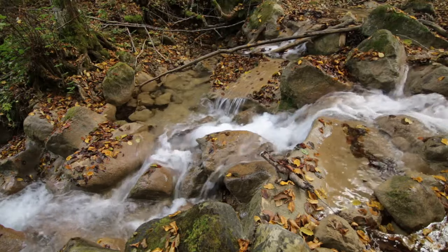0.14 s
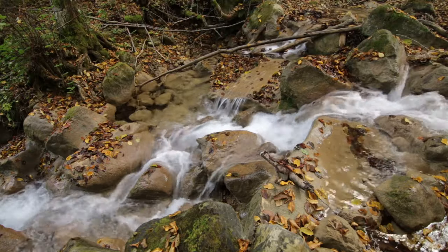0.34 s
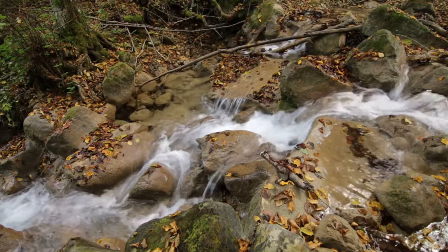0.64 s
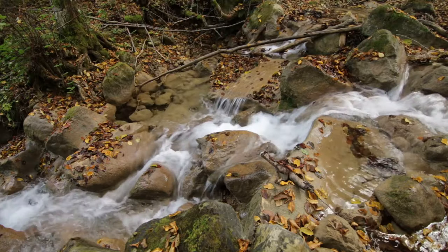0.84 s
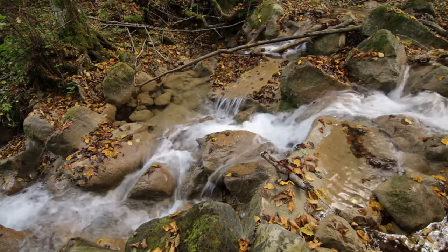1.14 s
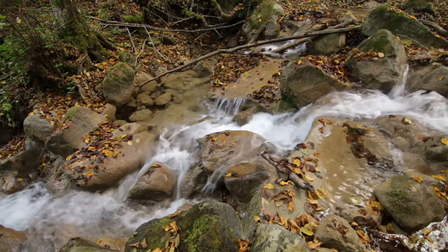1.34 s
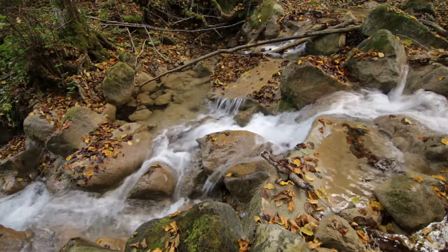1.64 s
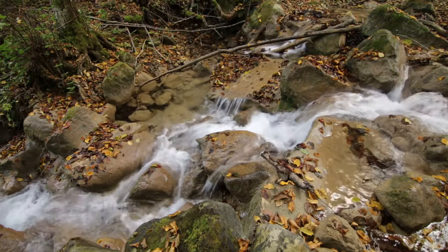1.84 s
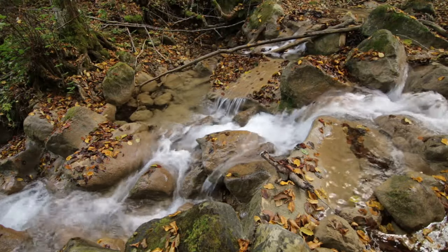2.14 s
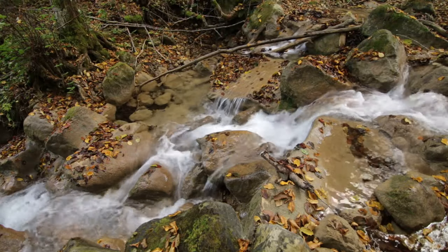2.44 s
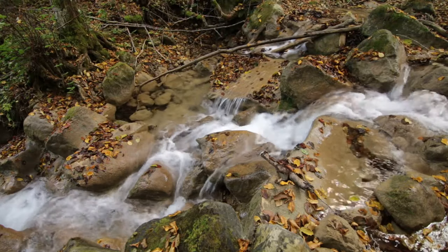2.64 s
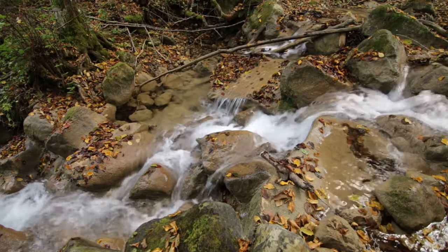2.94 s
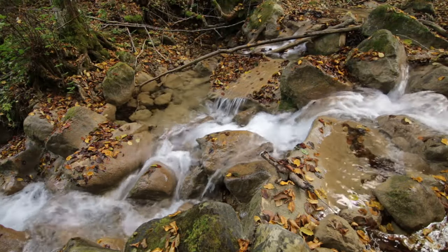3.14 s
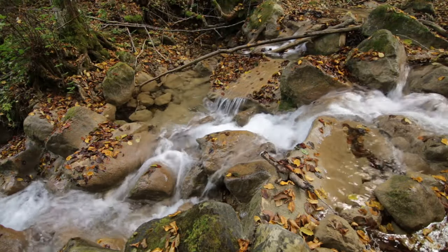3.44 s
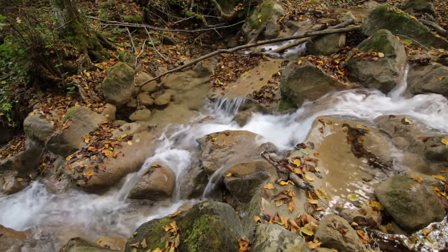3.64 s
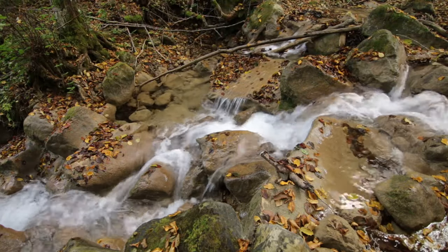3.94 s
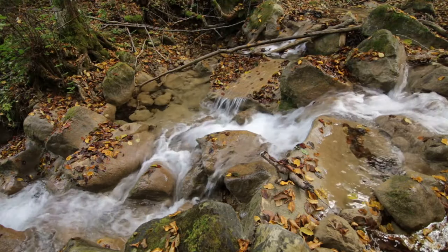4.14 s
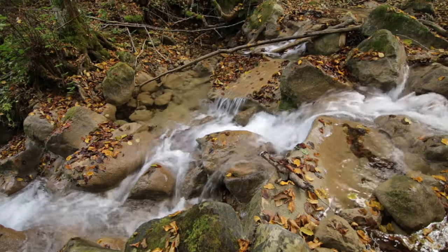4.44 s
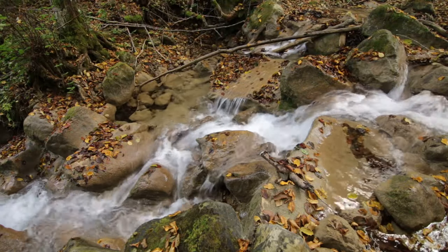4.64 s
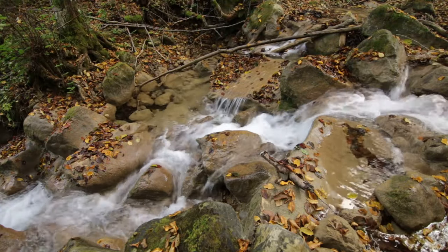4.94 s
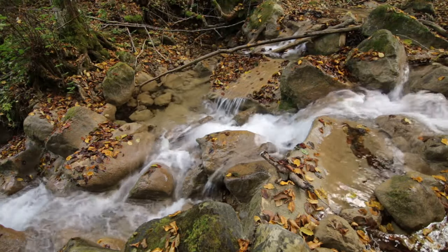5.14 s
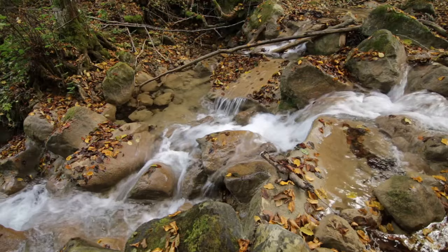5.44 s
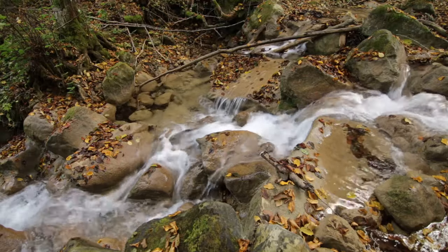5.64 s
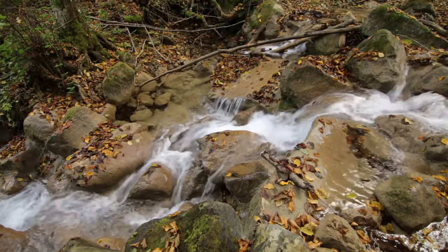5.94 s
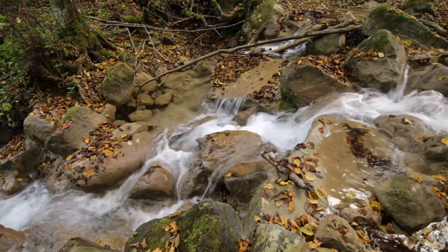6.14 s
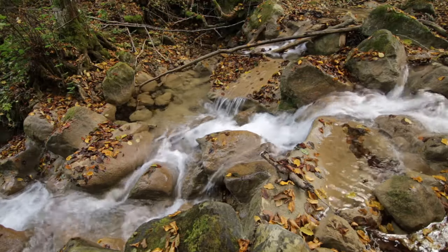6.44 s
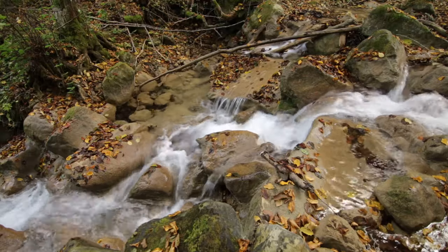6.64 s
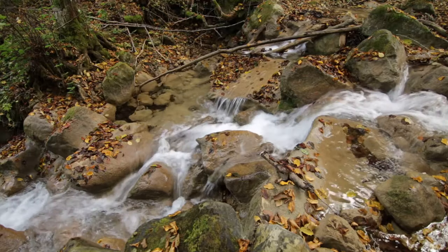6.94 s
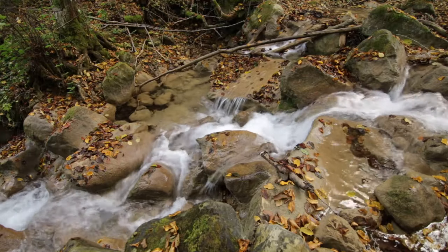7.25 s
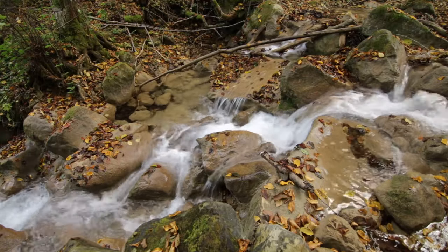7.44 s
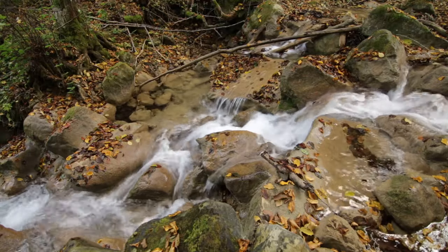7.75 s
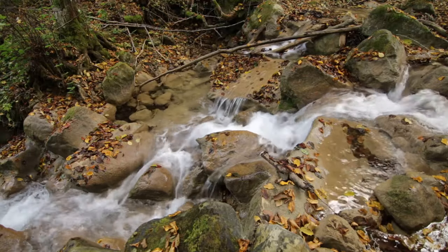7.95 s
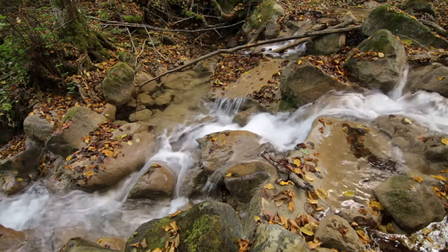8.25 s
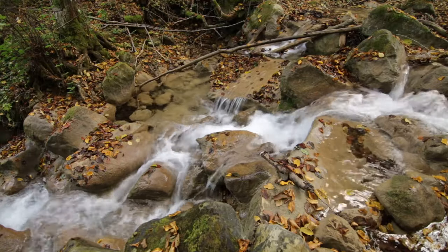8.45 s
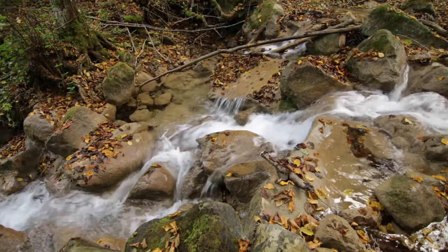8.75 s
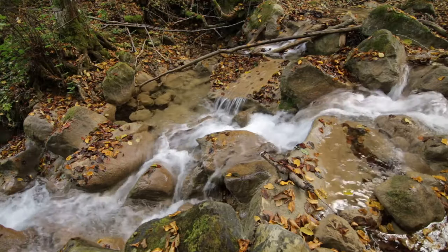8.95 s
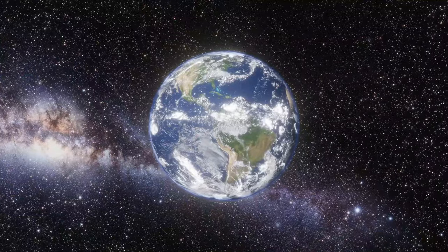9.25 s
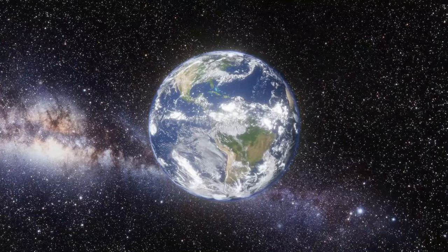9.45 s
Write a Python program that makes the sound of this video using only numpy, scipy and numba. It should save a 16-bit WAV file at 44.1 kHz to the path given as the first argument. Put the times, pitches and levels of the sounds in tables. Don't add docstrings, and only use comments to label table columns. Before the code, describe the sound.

Close, continuous gurgling of shallow water tumbling across rocks, bright with fine splashes and little bubble plops, cutting to silence near the end.

```python
import sys
import numpy as np
from scipy import signal
from scipy.fft import rfft, irfft
from scipy.io import wavfile
from scipy.ndimage import uniform_filter1d
from numba import njit

SR = 44100
rng = np.random.default_rng(int(sys.argv[2]) if len(sys.argv) > 2 else 0)


def field_ratio(decibels):
    return 10 ** (np.asarray(decibels, dtype=float) / 20)


def unload_audio(sound):
    columns = np.transpose(np.atleast_2d(sound))
    steps = np.round(np.clip(columns, -1, 1) * 32767)
    wavfile.write(sys.argv[1], SR, steps.astype(np.int16))


N = 423801

CROSSOVERS_HZ = (330, 780, 1800)
# frequency in Hz, level in dB per Hz.
WATER_COLOUR = [(15, -66.5), (25, -37), (80, -23), (129, -7), (261, -6), (617, -1.5), (830, -5), (1000, -4),
                (1770, -9.5), (2570, -9), (3030, -11.5), (3560, -13), (9900, -18), (13700, -22),
                (15700, -30.5)]
# frequency in Hz, left minus right in dB.
STEREO_LEAN = [(60, -6), (110, -1.5), (200, -1.0), (380, -1.5), (700, -1.0), (1290, -2.0), (2380, -2.0),
               (4400, -2.5), (8120, -3.5), (15000, -5.5)]
# frequency in Hz, likeness of left and right 0-1.
FAR_LIKENESS = [(60, 0.8), (130, 0.94), (290, 0.93), (640, 1), (1410, 0.5), (3100, 0.6), (6820, 0.03),
                (15000, 0.2)]
# level in dB, left lag in samples, spread of lag over the bed
# in samples, ring length in cycles, size scatter in dB, pitch rise as a fraction.
NEAR_CLOUD = (0.1, 2.21, 1.34, 8.55, 2.65, .25)
SIDE_CLOUD = (-2.5, -0.5, 4.5, 6.5, 2, 0.32)
# delay in ms, level in dB, phase turned by the wet surface in cycles.
ROCK_ECHOES = [(.95, -16, -0.35), (1.9, -21, 0.046)]
# pitch in Hz, width in Hz, lift in dB.
ROCK_HOLLOWS = [(72, 22, 5), (128.6, 20, 5.5), (663, 92, 1.5), (1000.4, 38, 5.5), (1130, 120, 3.5),
                (2095, 310, 2), (2666, 380, 0.34), (3540, 600, 2), (4520, 260, 2.2), (5500, 440, 1),
                (6630, 380, 1), (9750, 700, 1.2)]
# time in seconds, level in dB.
FLOW_LEVELS = [(0.0, -24), (0.2, -25.5), (1.22, -25), (1.32, -23.5), (1.64, -25), (4.71, -26),
               (5.13, -24.5), (5.78, -25.5), (6.1, -25), (7.72, -25.5), (8.89, -25.5), (8.94, -25)]
# depth in dB, changes per second.
SIZE_WAVER = [
    (1.3, 6),
    (0.6, 15),
    (0.63, 12),
    (0.33, 8),
]
# time in seconds, lift in dB.
WATER_SLUGS = [(0.11, 0.5), (0.57, 2), (0.92, -1), (1.09, 2), (2.24, 0.5), (2.31, 1), (3.19, 1),
               (3.53, 1.5), (3.63, -0.5), (3.81, 1), (4.63, -1), (4.9, 1.5), (6.08, 2.5), (6.5, 0.5),
               (6.6, 3), (8.04, 4.5), (8.71, 3), (8.79, 1)]
# time in seconds, change in dB.
CHURN_LULLS = [(0.52, -1), (0.82, -2), (0.97, -1), (1.79, -1.5), (2.16, -1), (2.74, -2.5), (3.46, -2.5),
               (3.58, -1.5), (4.56, -0.5), (4.68, 0), (5.95, -3.5), (6.57, -3), (8.02, -2)]
SLUG_SHARES = (0.093, 1.35, .2, 0.18)
# start in seconds, peak in dB, pitch in Hz.
BIG_BUBBLES = [(0.12, -6, 557), (0.261, -5.5, 571), (1.033, -10.5, 724), (1.284, -11, 697),
               (1.648, -6.5, 686), (1.965, -8, 608), (2.025, -4, 511), (2.125, -6, 455), (2.514, -6.5, 593),
               (2.589, -9.5, 711), (2.844, -10, 635), (3.056, -7, 713), (3.178, -6.5, 436),
               (3.62, -5.5, 452), (3.799, -3.5, 568), (4.189, -7, 581), (4.612, -7.5, 458),
               (4.643, -5, 301), (4.979, -8, 390), (5.016, -8.5, 418), (5.246, -7.5, 474), (5.96, -7, 476),
               (6.479, -11.5, 643), (8.033, -11.5, 434), (8.282, -10.5, 621), (8.475, -7.5, 372),
               (8.682, -7, 646), (8.784, -3.5, 635)]
# start in seconds, peak in dB, pitch in Hz.
HOLLOW_PLOPS = [(0.308, -9, 1104), (1.59, -5.5, 936), (3.571, -6, 1102), (3.74, -10.5, 1010),
                (4.244, -4, 1003), (5.202, -9, 972), (5.521, -9, 1000), (6.852, -10.5, 1004),
                (7.07, -5, 1050), (7.12, -6.5, 1100), (7.19, -6, 1000), (7.799, -1, 999), (8.349, -9, 1195),
                (8.384, -7, 998)]
# start in seconds, peak in dB, pitch in Hz.
ROCK_DROPS = [(0.127, -12, 2550), (0.204, -12, 2390), (0.504, -6.5, 2110), (0.955, -13, 2170),
              (1.847, -14, 2020), (2.0, -13.5, 2780), (2.127, -12, 2540), (2.493, -9, 2580),
              (2.8325, -14, 1930), (2.959, -11.5, 2300), (3.013, -6.5, 2250), (5.529, -7.5, 2640),
              (6.011, -14.5, 2045), (6.197, -10.5, 2470), (6.357, -15, 2060), (6.456, -12.5, 2025),
              (7.998, -16, 2040), (8.626, -13, 2130), (8.765, -10.5, 2210), (8.892, -12.5, 2065)]

WATER_DB, FAR_DB, FAR_ECHO_DB = -19, 0.5, -11.5
SPLASH_S, SPLASH_SIZE_SPREAD = 0.012, 0.0406
SLUG_S, LULL_S = 0.022, 0.034
GULP_CYCLES, PLOP_CYCLES, DROP_CYCLES = 10.5, 9, 5
START_DELAY_S = 0.0015
MIC_TOP_HZ = 15650
RUMBLE_DB, RUMBLE_TOP_HZ = -68.5, 55
CUT_S, FADE_S = 8.953, 0.002


def curve(points, hz):
    f, v = np.transpose(points)
    return np.interp(np.log(hz + 1), np.log(f + 1), v)


def level(x, db):
    return x * field_ratio(db) / np.sqrt(np.mean(x ** 2))


@njit
def ring(start, turn, cycles, size, rise, n):
    out = np.zeros(n)
    for k in range(len(start)):
        length = int(cycles[k] / turn[k]) + 1
        first = int(np.ceil(start[k]))
        pole = 2j * np.pi * turn[k] - np.log(100.) / length
        z = size[k] * np.exp(pole * (first - start[k]))
        p = np.exp(pole)
        climb = np.exp(2j * np.pi * turn[k] * rise / length)
        for i in range(max(first, 0), min(first + length, n)):
            out[i] += z.imag
            z *= p
            p *= climb
    return out


def bubble_cloud(db, lag, spread, cycles, scatter_db, rise, splashes, bubbles_each):
    count = splashes * bubbles_each
    when, small = np.repeat(rng.random((splashes, 2)), bubbles_each, axis=0).T
    place = np.repeat(rng.standard_normal(splashes), bubbles_each)
    after, unlike, long = rng.random((count, 3)).T
    small = np.clip(small + SPLASH_SIZE_SPREAD * (2 * unlike - 1), 0, 1)
    low, high = np.sqrt(90), np.sqrt(16000)
    hz = (low + small * (high - low)) ** 2
    rare = np.minimum(rng.exponential(size=count), 4)
    strength = hz ** 0.75 * field_ratio(scatter_db * rare / (1 + hz / 5000))
    start = when * N + after * SPLASH_S * SR
    half_lag = (lag + spread * place) / 2
    rings = cycles * (0.5 + long)
    ears = [ring(start + side * half_lag, hz / SR, rings, strength, rise, N) for side in (1, -1)]
    return level(np.array(ears), db)


def far_water(hz):
    mid, side = rfft(rng.standard_normal((2, N)))
    alike = np.clip(curve(FAR_LIKENESS, hz), 0, 1)
    mid = mid * np.sqrt(1 + alike)
    side = side * np.sqrt(1 - alike)
    return np.array([mid + side, mid - side]) / np.sqrt(2) * field_ratio(FAR_DB)


def rock_echoes(hz, offset_db):
    response = 1
    for ms, db, turn in ROCK_ECHOES:
        response = response + field_ratio(db + offset_db) * np.exp(-2j * np.pi * (hz * ms / 1000 + turn))
    return response


def rock_hollows(hz):
    return field_ratio(sum(db / (1 + ((hz - f) / width * 2) ** 2) for f, width, db in ROCK_HOLLOWS))


def waver(rate_hz):
    steps = rng.standard_normal(400)[(np.arange(N) * rate_hz / SR).astype(int)]
    hold = int(SR / rate_hz)
    smooth = uniform_filter1d(uniform_filter1d(steps, hold), hold)
    return smooth / np.std(smooth)


def bumps(table, width_s):
    t = np.arange(N) / SR
    return sum(db * np.exp(-((t - s) / width_s) ** 2) for s, db in table)


def surges(water, hz):
    s, flow_db = np.transpose(FLOW_LEVELS)
    flow_db = np.interp(np.arange(N) / SR, s, flow_db - np.mean(flow_db))
    slug_db = bumps(WATER_SLUGS, SLUG_S) + bumps(CHURN_LULLS, LULL_S)
    lows = [0] + [1 / (1 + (hz / edge) ** 6) for edge in CROSSOVERS_HZ] + [1]
    out = 0
    for k, (depth_db, rate_hz) in enumerate(SIZE_WAVER):
        swell_db = flow_db + SLUG_SHARES[k] * slug_db + depth_db * waver(rate_hz)
        out = out + field_ratio(swell_db) * irfft(water * (lows[k + 1] - lows[k]), N)
    return out


def stream():
    hz = np.arange(N // 2 + 1) * SR / N
    near = rfft(bubble_cloud(*NEAR_CLOUD, splashes=25000, bubbles_each=4))
    rest = rfft(bubble_cloud(*SIDE_CLOUD, splashes=50000, bubbles_each=2)) + far_water(hz)
    water = near * rock_echoes(hz, 0) + rest * rock_echoes(hz, FAR_ECHO_DB)
    water = water / (1 + (hz / MIC_TOP_HZ) ** 70) * rock_hollows(hz)
    lean_db = curve(STEREO_LEAN, hz) * np.array([[0.5], [-0.5]])
    water = water * field_ratio(curve(WATER_COLOUR, hz) + lean_db)
    return level(surges(water, hz), WATER_DB)


def mic_rumble(shape):
    low_pass = signal.butter(2, RUMBLE_TOP_HZ, fs=SR, output="sos")
    return level(signal.sosfilt(low_pass, rng.standard_normal(shape)), RUMBLE_DB)


def single_bubbles():
    s, db, hz = np.transpose(BIG_BUBBLES + HOLLOW_PLOPS + ROCK_DROPS)
    counts = [len(BIG_BUBBLES), len(HOLLOW_PLOPS), len(ROCK_DROPS)]
    cycles = np.repeat([float(GULP_CYCLES), PLOP_CYCLES, DROP_CYCLES], counts)
    one = ring((s + START_DELAY_S) * SR, hz / SR, cycles, field_ratio(db - 5.5), 0.2, N)
    one = signal.sosfilt(signal.butter(4, 200, "high", fs=SR, output="sos"), one)
    return one * field_ratio(np.array([[-0.7], [0.7]]))


def scene():
    return stream() + single_bubbles()


def roll_off(x):
    return signal.sosfilt(signal.butter(12, 15810, fs=SR, output="sos"), x)


def record(dry):
    cut = np.clip((CUT_S - np.arange(N) / SR) / FADE_S + 0.5, 0, 1)
    return roll_off((dry + mic_rumble(dry.shape)) * cut)


dry = scene()
out = record(dry)
unload_audio(out)
```